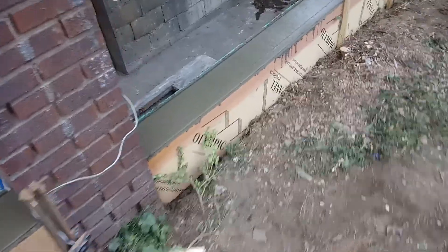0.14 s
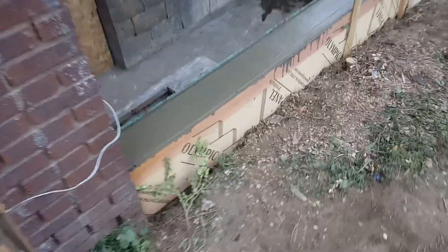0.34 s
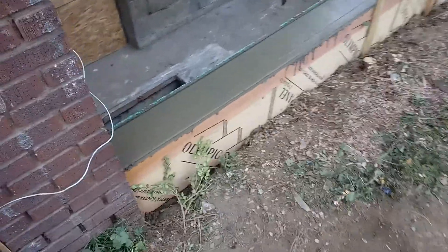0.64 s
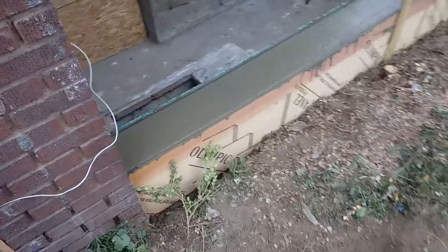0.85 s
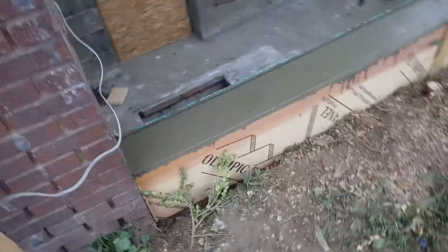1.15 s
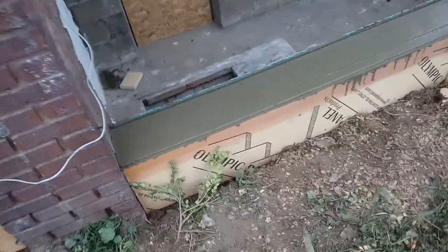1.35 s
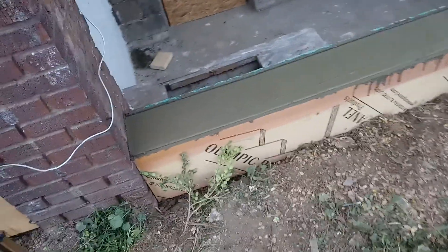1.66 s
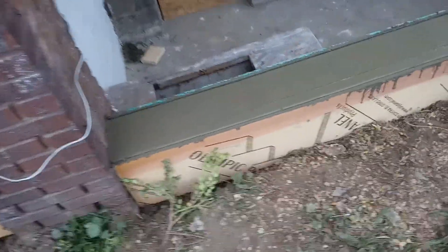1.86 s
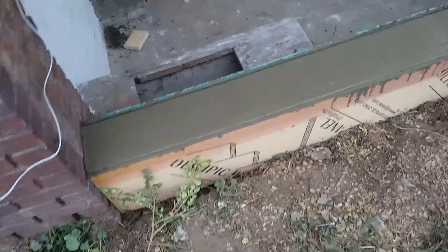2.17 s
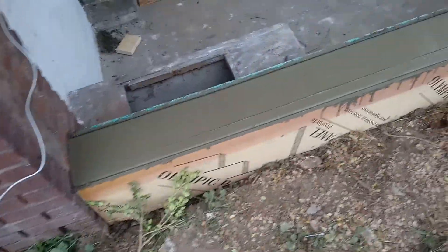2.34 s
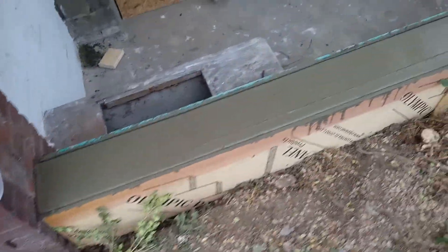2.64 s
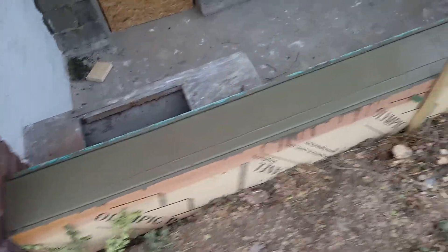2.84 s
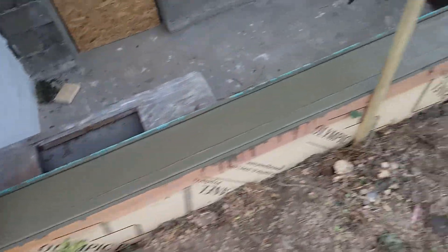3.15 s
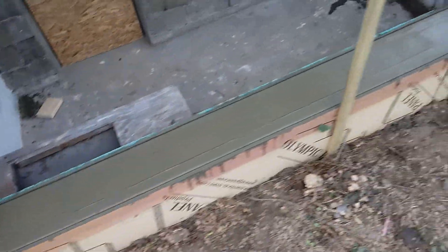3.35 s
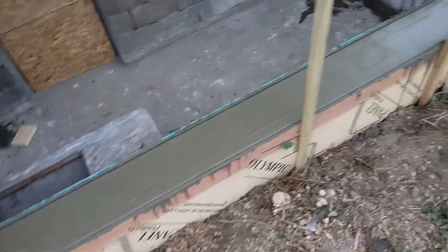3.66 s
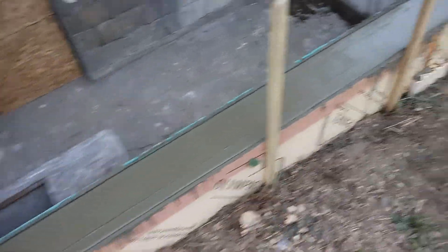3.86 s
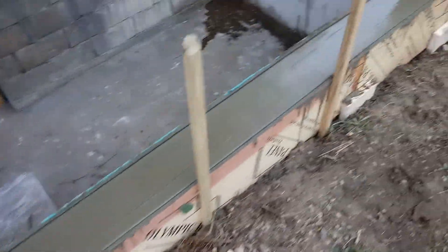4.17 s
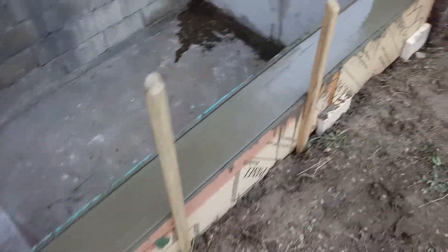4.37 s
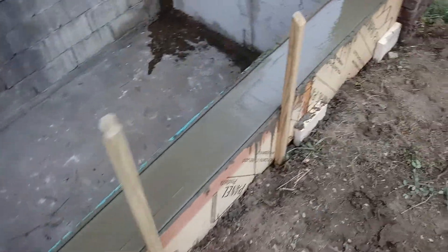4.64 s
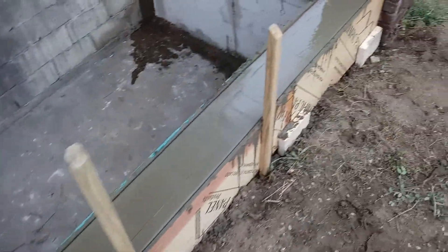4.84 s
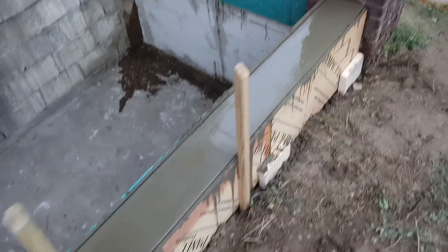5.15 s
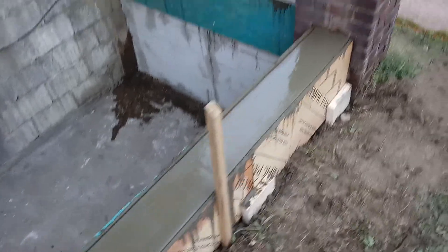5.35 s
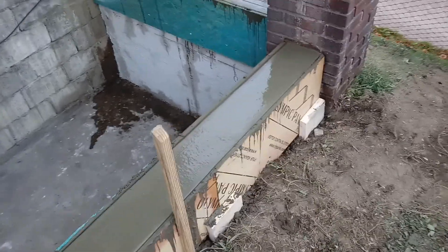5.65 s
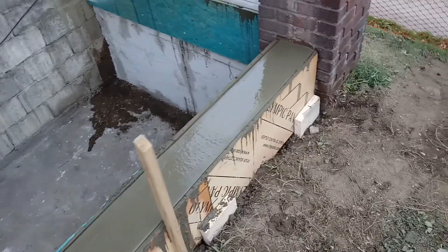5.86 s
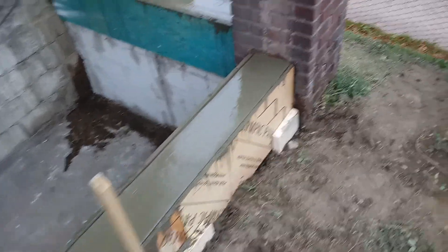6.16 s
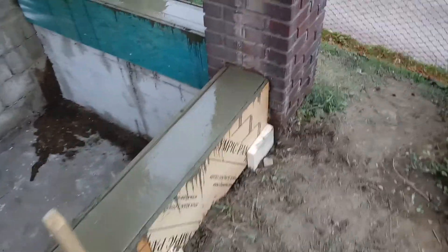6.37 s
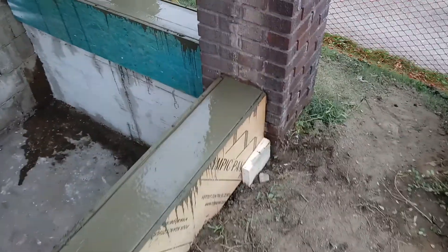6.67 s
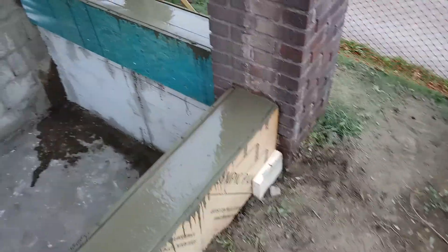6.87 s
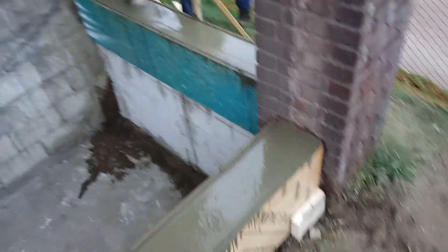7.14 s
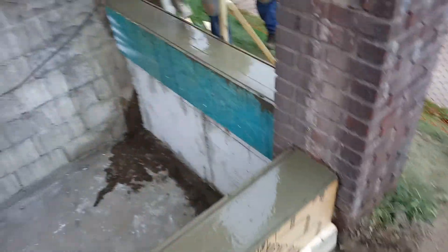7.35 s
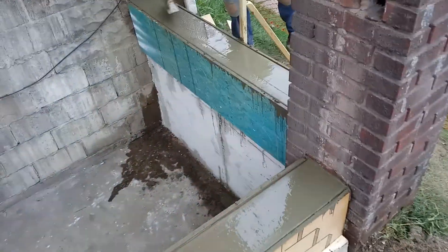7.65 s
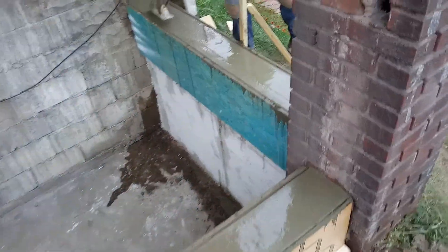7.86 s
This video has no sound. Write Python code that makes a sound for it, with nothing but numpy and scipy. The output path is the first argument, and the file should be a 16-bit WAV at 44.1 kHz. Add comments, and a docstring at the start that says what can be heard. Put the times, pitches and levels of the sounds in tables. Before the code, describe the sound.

Outdoors, metal clanks and rattles down, a deep boom follows, dry footsteps crackle, and a gritty scrape snaps past as insects chirr.

```python
"""A metal tool clatters down near a small hand-held microphone: blows and chatter set off its fading ring modes.
Close by, feet rustle and snap dry stalks (crackling noise), and something scrapes once across grit.
A heavy thud is a push of air and a boom with noisy echoes; narrow hisses, thin squeaks and a moan come and go.
Behind are a small gliding bird, a cricket in pure-toned strokes, an insect chorus of clicks through ringing
modes, and a traffic wash of slowly shifting noise."""
import sys
import numpy as np
from scipy import signal
from scipy.fft import rfft, irfft
from scipy.io import wavfile
from scipy.ndimage import uniform_filter1d

SR = 44100
rng = np.random.default_rng(int(sys.argv[2]) if len(sys.argv) > 2 else 0)


def store_pcm(level_fs):
    """Save levels as 16-bit WAV."""
    pcm = np.round(np.clip(level_fs, -1, 1) * 32767).astype(np.int16)
    wavfile.write(sys.argv[1], SR, np.atleast_2d(pcm).T)


def natural_amplitude(level_db):
    """Convert a level in decibels to a linear amplitude factor, elementwise."""
    exponent = np.asarray(level_db, float) / 20
    return 10 ** exponent


N = 353241  # length in samples, about 8 s


def evened(x):
    """Scales a sound to rms 1."""
    return x / np.sqrt(np.mean(x ** 2) + 1e-20)


def read(points, hz):
    """Reads a spectrum table at the given frequencies, along a logarithmic pitch scale."""
    f, value = np.transpose(points)
    return np.interp(np.log(hz + 1), np.log(f + 1), value)


def curve(rows, count=1):
    """Reads one column of a timed table at every sample."""
    rows = np.array(rows)
    return np.interp(np.arange(N) / SR, rows[:, 0], rows[:, count])


def add(mix, s, sound):
    """Lays a sound into the mix at s seconds."""
    part = mix[round(s * SR):][:len(sound)]
    part += sound[:len(part)]


def filtered(x, points):
    """Filters a sound by a spectrum table."""
    gain = natural_amplitude(read(points, np.fft.rfftfreq(x.shape[-1], 1 / SR)))
    return irfft(rfft(x) * gain, x.shape[-1])


def coloured(x, points):
    """Filters a sound by a spectrum table and brings it to rms 1."""
    return evened(filtered(x, points))


def grains(per_s, spread_db):
    """Random sparse clicks of either sign and uneven size, rms 1."""
    size_db = spread_db * np.minimum(rng.exponential(1, N), 5)
    clicks = natural_amplitude(size_db) * rng.choice([-1., 1.], N)
    return evened(clicks * (rng.random(N) < per_s / SR))


def lumps(db, size):
    """Random gain that wavers by db, smoothed twice over size samples."""
    smooth = uniform_filter1d(uniform_filter1d(rng.standard_normal(N), size), size)
    return natural_amplitude(db * evened(smooth))


def swells(rows):
    """Gain of overlapping swells (start_s, peak_s, end_s, level_db), summed in power."""
    edge_db, cut_s = -5.5, 0.038  # level of start and end under the peak; time of the outer fades
    t = np.arange(N) / SR
    shape = natural_amplitude(np.array([-60, edge_db, 0, edge_db, -60]))
    power = 0
    for start, peak, end, db in rows:
        times = [start - cut_s, start, peak, end, end + cut_s]
        power = power + (natural_amplitude(db) * np.interp(t, times, shape, 0, 0)) ** 2
    return np.sqrt(power)


def narrow(x, hz, width_hz):
    """Noise around one pitch: x is smoothed to a slow signal, which then scales a sine; rms 1."""
    r = np.exp(-np.pi * width_hz / SR)
    slow = signal.lfilter([1], [1, -2 * r, r * r], x)
    return evened(slow * np.sin(2 * np.pi * hz * np.arange(N) / SR))


def push(db, hz, t60):
    """One dull fading pulse of pressure; a high-pass removes the steady part that air does not carry."""
    t = np.arange(4000) / SR
    pulse = natural_amplitude(db - 60 * t / t60) * np.sin(2 * np.pi * hz * t)
    return signal.lfilter(*signal.butter(2, hz / 3, "high", fs=SR), pulse)


# Colour of the distant traffic: pitch_hz, level_db (per Hz)
TRAFFIC_COLOUR = [(18, -54), (45, -20), (131, -1), (499, -4.5), (801, 1), (1010, 1), (2010, -7),
                  (2540, -18), (2900, -20.5), (3580, -23), (4910, -24), (7000, -21.5), (8300, -52.5),
                  (13300, -47), (16000, -56)]
# Swell of the traffic roar: time_s, level_db
ROAR_SWELL = [(0, -52), (.35, -51.5), (.7, -53), (1.5, -50), (2.2, -51.5), (3.0, -52.5), (4.0, -52.5),
              (4.6, -51.5), (5.1, -54.5), (5.67, -49.5), (6.24, -52.5), (6.85, -49.5), (7.4, -53),
              (8.01, -51)]


def wash(patchy_db=1.5):
    """Traffic noise whose spectrum drifts in soft patches; the roar swells, the rumble wanders by chance."""
    rumble_db, rumble_wander_db = -62.5, 1.74
    hz = np.fft.rfftfreq(1024, 1 / SR)
    a, b, patches = rng.standard_normal((N // 256 + 5, 513, 3)).T
    wander = evened(uniform_filter1d(patches[0], size=40))
    patches = uniform_filter1d(patches, size=10, axis=0)
    patches = evened(uniform_filter1d(patches, size=14, axis=1))
    spectrum = (a + 1j * b) * natural_amplitude(read(TRAFFIC_COLOUR, hz)[:, None] + patchy_db * patches)
    low = np.clip((500 - hz) / 200, 0, 1)[:, None]  # crossover from rumble to roar, 300 to 500 Hz

    def sound(weight):
        return evened(signal.istft(spectrum * weight, nperseg=1024, noverlap=768)[1][:N])

    roar = sound(1 - low)
    rumble = sound(low * natural_amplitude(rumble_wander_db * wander))
    return natural_amplitude(curve(ROAR_SWELL)) * roar + natural_amplitude(rumble_db) * rumble


# Ring modes of the insects' tymbals: pitch_hz, level_db, ring_s (time to fade by 60 dB)
TYMBAL_MODES = [(6060, 2.5, 0.0067), (6060, 3, 0.016), (6320, -2.5, 0.039), (6600, -2, 0.014),
                (7000, -16, 0.0063)]
# Loudness of the chorus: time_s, level_db
CHORUS_LOUDNESS = [(0, -59.5), (.7, -61.5), (1.25, -62.5), (1.65, -65), (2.5, -63.5), (2.9, -61),
                   (3.3, -63.5), (3.75, -64.5), (4.3, -58.5), (5.15, -62.5), (6.15, -62), (6.55, -56),
                   (6.8, -57.5), (7.35, -60), (8.01, -60.5)]


def chorus(throb_hz=38.7, depth=0.16):
    """Many insects click their tymbals at random, ringing a few modes; a shared throb runs through it."""
    t, out = np.arange(1500) / SR, np.zeros(N)
    for hz, db, t60 in TYMBAL_MODES:
        onset = np.minimum(t / 0.00027, 1)
        ring = natural_amplitude(db - 60 * t / t60) * np.sin(2 * np.pi * hz * t) * onset
        out += signal.oaconvolve(grains(per_s=2500, spread_db=-1.5), ring)[:N]
    throb = 1 + depth * np.sin(2 * np.pi * throb_hz * np.arange(N) / SR)
    return natural_amplitude(curve(CHORUS_LOUDNESS)) * throb * evened(out)


# Cricket chirps: start_s, level_db (before a random waver)
CRICKET_CHIRPS = [(.153, -70.5), (1.98, -68), (2.403, -81.5), (3.325, -66), (3.83, -69), (4.291, -60),
                  (4.775, -65), (5.271, -60.5), (5.739, -61.5), (6.259, -68), (6.694, -66), (7.728, -64.5)]


def cricket(hz=7530, stroke_hz=91, duty=0.69):
    """Eight wing strokes a chirp, each a short pure ring."""
    t, out = np.arange(round(8 * SR / stroke_hz)) / SR, np.zeros(N)
    strokes = np.sin(np.pi * np.minimum(t * stroke_hz % 1 / duty, 1)) ** .7
    rise = np.minimum(0.63 + t / 0.027, 1)  # the first stroke is weaker
    for s, db in CRICKET_CHIRPS:
        add(out, s, natural_amplitude(db) * strokes * rise * np.sin(2 * np.pi * hz * t))
    return out * lumps(1.7, size=60)


# Bird cheeps: start_s, length_s, start_hz, end_hz, level_db (at the peak)
BIRD_CHEEPS = [(5.218, 0.036, 3050, 3620, -58), (5.308, .02, 3290, 3450, -57),
               (5.339, 0.03, 3710, 3470, -54), (6.645, 0.033, 3510, 3280, -47)]


def bird():
    """Short whistles that glide evenly in pitch and swell and fade."""
    out = np.zeros(N)
    for s, length, start_hz, end_hz, db in BIRD_CHEEPS:
        hz = np.linspace(start_hz, end_hz, round(length * SR))
        add(out, s, natural_amplitude(db) * np.hanning(len(hz)) * np.sin(2 * np.pi * np.cumsum(hz) / SR))
    return out


# Narrow rough bands: start_s, peak_s, end_s, level_db, centre_hz
HISS_BANDS = [(.0, .1, 0.15, -60, 3450), (1.9, 1.92, 2.6, -63.5, 3450), (2.4, 2.8, 3.04, -57, 2080),
              (3.938, 4.44, 4.9, -63.5, 3430), (4.254, 4.46, 5, -66, 2050), (5.2, 5.344, 5.6, -64.5, 3500),
              (5.402, 5.55, 5.56, -59.5, 2080), (6.304, 6.35, 6.3, -66, 3420), (6.4, 6.5, 6.65, -62, 2050),
              (6.553, 6.655, 6.9, -57.5, 3400), (7.07, 7.078, 7.25, -47, 3340),
              (7.073, 7.083, 7.1, -46, 5920), (7.174, 7.18, 7.25, -43, 2070), (7.7, 7.85, 9.8, -62.5, 2000)]


def hiss(width_hz=250):
    """Each swell is dense clicks narrowed to a band around one pitch."""
    clicks = grains(per_s=3000, spread_db=1.5)
    out = np.zeros(N)
    for *swell, hz in HISS_BANDS:
        out += swells([swell]) * narrow(clicks, hz, width_hz)
    return out


# Thin squeaks, each one arch of pitch: start_s, length_s, start_hz, middle_hz, end_hz
SQUEAK_ARCHES = [(2.454, 0.058, 9000, 8900, 8900), (2.598, 0.19, 8900, 9400, 9050),
                 (5.58, .06, 9000, 9150, 9150), (5.74, 0.18, 9800, 9820, 9100)]


def squeaks(level_db=-85):
    """Faint pure tones on a parabola of pitch, with a random waver in level."""
    out = np.zeros(N)
    for s, length, *points_hz in SQUEAK_ARCHES:
        u = np.linspace(0, 1, round(length * SR))
        hz = np.polyval(np.polyfit([0, .5, 1], points_hz, 2), u)
        fade = np.sqrt(np.hanning(len(u)))
        add(out, s, natural_amplitude(level_db) * fade * np.sin(2 * np.pi * np.cumsum(hz) / SR))
    return out * lumps(4.7, size=400)


# Path of the low moan: time_s, pitch_hz, level_db (rms)
MOAN_PATH = [(4.59, 288, -74), (4.612, 337, -57), (4.63, 310, -53.5), (4.692, 267, -62), (4.72, 270, -71)]


def moan():
    """One soft short tone that rises briefly, then mostly falls."""
    start, end = MOAN_PATH[0][0], MOAN_PATH[-1][0]
    fade = curve([(start - .02, 0), (start, 1), (end, 1), (end + 0.018, 0)])
    tone = np.sin(2 * np.pi * np.cumsum(curve(MOAN_PATH)) / SR)
    return np.sqrt(2) * fade * natural_amplitude(curve(MOAN_PATH, count=2)) * tone


# The thud and its returns from far walls: start_s, tail_db, push_db, push_hz
THUD_RETURNS = [(1.539, -25.5, -11, 350), (1.575, -30.5, -20, 300), (1.678, -44.5, -27, 780),
                (1.719, -40.5, -33, 614), (1.809, -46, -38, 930), (1.835, -54, -32, 1110)]
# Colour of the echoes: pitch_hz, level_db (per Hz)
THUD_COLOUR = [(25, -32), (70, -21), (110, -8.5), (199, -4.5), (464, -5), (549, -6), (630, -3.5), (911, -6),
               (1220, -9), (1560, -7.5), (1970, -15), (2700, -28), (6760, -41), (8000, -60), (12000, -89)]
# How long the yard echoes: pitch_hz, fade_s (time to fade by 60 dB)
YARD_ECHO = [(60, 0.91), (160, 1.64), (420, 1.43), (1100, 1.62), (2900, 1.6), (7000, .2)]


def thud():
    """A low push and a boom, then lumpy reflections that die band by band in the yard."""
    out, t = np.zeros(N), np.arange(SR * 2) / SR
    for s, db, push_db, push_hz in THUD_RETURNS:
        echoes = grains(per_s=2500, spread_db=1.6)[:len(t)]
        hz, ts, z = signal.stft(coloured(echoes, THUD_COLOUR), SR, nperseg=512)
        decay = natural_amplitude(-60 * ts / read(YARD_ECHO, hz)[:, None])
        tail = signal.istft(z * decay, SR, nperseg=512)[1][:len(t)]
        early = 0.32 + natural_amplitude(-60 * t / 0.33)  # extra weight at the start
        add(out, s, natural_amplitude(db) * tail * np.minimum(t / 0.0011, 1) * early)
        add(out, s, push(push_db, push_hz, t60=0.021))
    boom = np.sin(2 * np.pi * 190 * t) * natural_amplitude(-60 * t / 0.17) * np.minimum(t / 0.008, 1)
    add(out, THUD_RETURNS[0][0], natural_amplitude(-19.5) * boom)
    return out


# Pressure of the scrape: time_s, level_db
SCRAPE_PRESSURE = [(6.8, -80), (6.9, -59.5), (7.0, -45), (7.024, -37.5), (7.13, -39.5), (7.17, -42),
                   (7.178, -31.5), (7.204, -38), (7.25, -42.5), (7.33, -66), (7.36, -80)]
# Colour of the grit: pitch_hz, level_db (per Hz)
GRIT_COLOUR = [(275, -30), (537, -13.5), (977, -5), (1300, -7), (1750, -1.5), (2050, 3), (2400, -8),
               (2800, -10), (3350, -2.5), (3900, -8.5), (4600, -5), (5200, -12), (5950, -3), (7030, -10),
               (7960, -32), (11000, -29), (13000, -40), (16000, -38)]


def scrape():
    """Grit catching under a dragged edge: clicks and noise whose level follows the pressure."""
    catches = grains(per_s=4000, spread_db=2.8) + 0.51 * rng.standard_normal(N)
    start, end = SCRAPE_PRESSURE[0][0], SCRAPE_PRESSURE[-1][0]
    inside = curve([(start - .02, 0), (start, 1), (end, 1), (end + .02, 0)])
    return inside * natural_amplitude(curve(SCRAPE_PRESSURE)) * coloured(catches, GRIT_COLOUR)


# Shuffles on dry ground: start_s, peak_s, end_s, crisp_db, body_above_crisp_db
SHUFFLES = [(.18, .19, 0.24, -73, 16), (.3, .41, 0.67, -70.5, 10.5), (0.507, 0.73, 1.2, -65, 4.5),
            (1.384, 1.466, 2.05, -74, 14), (1.78, 1.81, 3, -72, 3), (1.9, 1.905, 2.46, -67.5, 9),
            (2.457, 2.62, 3.2, -76, 9), (2.827, 2.847, 3.42, -66, 10), (2.9, 3.03, 4.8, -71, -9),
            (3.555, 3.582, 3.64, -67.5, 7.5), (3.67, 3.678, 3.4, -69, 12.5), (3.885, 4.14, 4.5, -71, 13.5),
            (4.22, 4.44, 4.57, -62.5, 9.5), (4.62, 4.64, 4.74, -67.5, 12), (4.803, 4.852, 4.95, -67, 6),
            (5.0, 5.32, 6, -74.5, 6), (5.405, 5.41, 5.42, -72, 16), (5.604, 5.73, 5.17, -54, 12),
            (6.316, 6.491, 6.55, -64.5, 10), (6.576, 6.952, 7.22, -60, 6), (7.478, 7.5, 7.1, -77, 18),
            (7.7, 7.76, 6.7, -77, 6.5)]
# Colour of the crisp top: pitch_hz, level_db (per Hz)
CRISP_COLOUR = [(3000, -28), (5500, -3.5), (6500, -2), (7490, -9), (8060, -14.5), (9980, -16.5),
                (11200, -23), (12300, -34), (14000, -45)]
# Colour of the duller body: pitch_hz, level_db (per Hz)
BODY_COLOUR = [(880, -32), (1500, -7.5), (2020, 1), (2450, -10), (2950, -6), (3600, -3), (5070, -6.5),
               (5880, -7.5), (7000, -18), (9100, -61)]
# Colour of the fine fizz at the very top: pitch_hz, level_db (per Hz)
FIZZ_COLOUR = [(9000, -32), (11500, -12), (13000, -2), (16000, 2)]
# Puffs of fizz: peak_s, level_db
FIZZ_PUFFS = [(.42, -86), (1.81, -88), (2.9, -86), (3.32, -83), (4.45, -77), (4.87, -80), (5.41, -89),
              (5.729, -80), (6.62, -85), (6.9, -83)]


def rustle():
    """Dense crackle of dry stalks: a crisp top, a duller body with a rough ring on it, and puffs of fizz."""
    lumps_db = 1.55  # it comes in uneven handfuls
    crisp_floor_db, body_floor_db, fizz_floor_db = -93, -68, -92.5  # always present under the swells
    fizz_half_s = .07  # half the length of a puff, without its fades
    crackle = grains(per_s=3000, spread_db=-1.0) + 0.67 * rng.standard_normal(N)
    crackle = crackle * lumps(lumps_db, size=1200)

    crisp = np.hypot(swells([row[:4] for row in SHUFFLES]), natural_amplitude(crisp_floor_db))
    body = swells([(a, p, b, db + above_db) for a, p, b, db, above_db in SHUFFLES])
    puffs = [(s - fizz_half_s, s, s + fizz_half_s, db) for s, db in FIZZ_PUFFS]
    fizz = np.hypot(swells(puffs), natural_amplitude(fizz_floor_db))

    out = crisp * lumps(lumps_db, size=3000) * coloured(crackle, CRISP_COLOUR)
    out += np.hypot(body, natural_amplitude(body_floor_db)) * coloured(crackle, BODY_COLOUR)
    out += fizz * coloured(crackle, FIZZ_COLOUR)
    rough_ring = narrow(grains(per_s=1800, spread_db=3.5), hz=3450, width_hz=410)
    return out + natural_amplitude(-11) * body * rough_ring


# Twigs and grit snapping: start_s, peak_db, centre_hz
TWIG_SNAPS = [(0.1877, -41.5, 4800), (1.3613, -49, 2610), (1.488, -44.5, 6060), (1.5267, -45, 5330),
              (1.7996, -46, 2720), (1.9041, -38, 3600), (2.838, -43.5, 6550), (2.9494, -42.5, 3600),
              (3.68, -50, 5930), (4.1608, -42, 5770), (4.4467, -40, 3860), (4.6453, -44, 3400),
              (5.3025, -46, 6100), (5.3985, -43.5, 5800), (5.5524, -49, 6060), (6.79, -47, 6140),
              (6.922, -41, 5970), (7.021, -32, 4620), (7.046, -27.5, 5800), (7.0698, -34, 5940),
              (7.112, -28.5, 5900), (7.129, -33, 5760), (7.1752, -25, 6100), (7.218, -38, 6020)]


def snaps():
    """Each snap is a broad tick with a short noisy ring near its centre."""
    t, out = np.arange(2500) / SR, np.zeros(N)
    fade = natural_amplitude(-60 * t / 0.039) + 0.54 * natural_amplitude(-60 * t / 0.24)  # a quick tick over a slower ring
    for s, db, hz in TWIG_SNAPS:
        colour = [(400, -30), (hz * 0.71, -12), (hz, 0), (hz * 1.4, -12),
                  (7600, -16), (9000, -28), (12000, -36), (16000, -46)]
        burst = coloured(rng.standard_normal(len(t)), sorted(colour))
        snap = burst * np.minimum(t / 0.00043, 1) * fade
        add(out, s, natural_amplitude(db) * snap / abs(snap).max())
    return out


# Ring modes of the metal tool, one value a mode: pitch_hz
MODE_HZ = [487, 831, 874, 953, 1032, 1069, 1161, 1341, 1425, 1630, 1685, 1870, 2059, 2225, 2248, 2375, 2600,
           2880, 3250, 3685, 3872, 4575, 4765, 5242, 5675, 5918, 6010, 6680, 7350, 8610, 9780, 11000]
# Strength of each mode: level_db
MODE_DB = [-16, -6, -4.5, -12, -3.5, -3, -0.5, -12, -17, -2.5, -6, -4, -9, -10.5, -12, -15, -12, -16, -14,
           -14, -12, -16, -15.5, -18.5, -31, -17, -38, -18, -33, -49, -39, -47]
# Ring of each mode left free: ring_s (time to fade by 60 dB)
MODE_RING_S = [0.64, 0.47, 0.47, 0.53, 0.42, 0.094, 0.055, 0.48, 0.77, 0.47, 0.12, 0.055, 0.44, 0.6, 0.3,
               0.14, 0.083, 0.17, 0.2, 0.076, 0.08, 0.18, 0.14, 0.29, 0.085, 0.18, 0.11, .18, 0.11, 0.12,
               0.062, 0.06]
# Share of a touch's muting that each mode takes: share (0 to 1)
MODE_MUTED = [0.36, 0.75, 1, 0.66, 0.35, 0.66, 1., 0.28, 0.029, 0.87, 0.8, .8, 0.27, 0.25, 0.45, .8, .8, .8,
              .4, .8, .6, .6, .4, .7, .7, .8, .8, .8, .8, .8, .8, .8]


def tool_modes():
    """The metal's ways of vibrating, each a fading sine: their pitches, muted shares and one-second rings."""
    t = np.arange(SR) / SR
    hz, db, t60, muted = np.array([MODE_HZ, MODE_DB, MODE_RING_S, MODE_MUTED])[:, :, None]
    sides = (-1) ** np.arange(len(hz))[:, None]  # neighbouring modes start in opposite directions
    onset = np.minimum(t / .0006, 1)
    return hz, muted, sides * natural_amplitude(db - 60 * t / t60) * np.sin(2 * np.pi * hz * t) * onset


# Blows on the tool: start_s, ring_db, favoured_hz, reach_octaves, crack_db
TOOL_BLOWS = [(0.7311, -30.5, 890, 0.83, -24.5), (.737, -26, 5500, 0.36, -27.5),
              (.762, -38, 6000, 0.77, -27.5), (.785, -44, 6000, .6, -33.5), (.803, -36.5, 1700, 0.13, -41),
              (.81, -34, 5200, 0.21, -40), (.835, -34, 6600, 0.46, -39), (.865, -53, 5200, 0.33, -43),
              (.929, -14.5, 1110, 0.58, -21), (.9425, -17, 1070, 0.52, -42), (.948, -17, 885, 0.28, -52),
              (.962, -19, 1100, 0.94, -57), (.979, -17, 885, 0.44, -42), (1.003, -18.5, 892, 0.042, -46),
              (1.118, -29.5, 845, 0.29, -41.5), (1.155, -42, 1210, 0.64, -51)]
# Touches on the ground that mute the ring: start_s, muted_by_db (for a mode with share 1)
GROUND_TOUCHES = [(.802, 0.5), (.928, 5), (0.945, 23.5), (.961, 3), (0.992, 10), (1.05, 5), (1.117, 15),
                  (1.154, 9)]


def tool_ring(hz, muted, rings):
    """Each blow rings the modes near its favoured pitch; each touch mutes those that move where it lands."""
    t, modes = np.arange(SR) / SR, np.zeros((len(hz), SR * 5 // 2))
    for s, db, *blow in sorted(TOOL_BLOWS + GROUND_TOUCHES):
        at = round(s * SR)
        if blow:
            centre_hz, reach, _ = blow
            nearness = 1 / (1 + (np.log2(hz / centre_hz) / reach) ** 2)
            modes[:, at:at + SR] += natural_amplitude(db) * nearness * rings
        else:
            left = natural_amplitude(-max(db, 0) * np.clip(muted, 0, 1))
            modes[:, at:at + SR] *= left + (1 - left) * np.exp(-t / 0.0042)
    return modes.sum(0)


# Colour of the crack of a blow: pitch_hz, level_db (per Hz)
CRACK_COLOUR = [(60, -34), (150, -22), (371, -12.5), (862, -1.5), (1660, -9), (2250, -5), (2500, -15),
                (4970, -9), (5860, -5.5), (8120, -22.5), (9800, -23), (11300, -34), (13000, -33),
                (16000, -31)]


def tool_cracks(t60=0.072):
    """Each blow also gives a short fading burst of noise."""
    t, out = np.arange(SR) / SR, np.zeros(N)
    for s, _, _, _, crack_db in TOOL_BLOWS:
        crack = coloured(rng.standard_normal(SR), CRACK_COLOUR) * np.minimum(t / 0.0012, 1)
        add(out, s, natural_amplitude(crack_db - 60 * t / t60) * crack)
    return out


# Bouts of chatter on the ground after a landing: start_s, length_s, level_db, change_db (over the bout)
CHATTER_BOUTS = [(0.734, 0.14, -65.5, -7), (0.929, 0.1, -52, -20.5), (1.12, 0.072, -70, -10)]


def tool_chatter(hz, rings, bright_db=2.5):
    """Random small hits on the lying tool, with rings made shorter and brighter (bright_db an octave)."""
    t, bouts, out = np.arange(SR) / SR, np.zeros(N), np.zeros(N)
    for s, length, db, fade_db in CHATTER_BOUTS:
        u = np.arange(0, length, 1 / SR)
        edges = np.minimum(np.minimum(u, length - u) / 0.0036, 1)
        add(bouts, s, natural_amplitude(db + fade_db * u / length) * edges)
    # lying down shortens the ring
    for ring in rings * natural_amplitude(bright_db * np.log2(hz / 1000) - 60 * t / 0.16):
        out += signal.oaconvolve(bouts * grains(per_s=530, spread_db=3.0), ring)[:N]
    return out


# Dull knocks of the tool's handle on the ground: start_s, level_db (before fade and high-pass), pitch_hz
HANDLE_KNOCKS = [(0.734, -25, 227), (.803, -23.5, 386), (.93, -42, 460)]


def handle_knocks():
    """Each knock is one short push of air."""
    out = np.zeros(N)
    for s, db, hz in HANDLE_KNOCKS:
        add(out, s, push(db, hz, t60=0.0077))
    return out


def tool():
    """The falling metal tool: ringing modes, noisy cracks, chatter on the ground and knocks of the handle."""
    hz, muted, rings = tool_modes()
    out = tool_cracks() + tool_chatter(hz, rings) + handle_knocks()
    add(out, 0, tool_ring(hz, muted, rings))
    return out


def scene():
    """All sources at one microphone."""
    background = wash() + chorus() + cricket() + bird()
    passing = hiss() + squeaks() + moan() + thud()
    near = scrape() + rustle() + snaps() + tool()
    return (background + passing + near)[None]


# Microphone colour (bass cut, port resonance, band edge): pitch_hz, gain_db
MIC_COLOUR = [(25, -4), (70, 4.5), (120, -0.5), (13700, 0), (14500, 6.5), (15300, 16.5), (15750, 7),
              (15900, -36)]


def microphone(dry):
    """The small microphone strengthens some pitches and weakens others."""
    return filtered(dry, MIC_COLOUR)


def low_pass(x):
    """Removes everything above the highest recorded frequency."""
    return signal.sosfilt(signal.butter(12, 16950, fs=SR, output="sos"), x)


def record(dry):
    """The scene as the hand-held microphone takes it down."""
    heard = microphone(dry)
    return low_pass(heard)


dry = scene()
out = record(dry)
store_pcm(out)
```